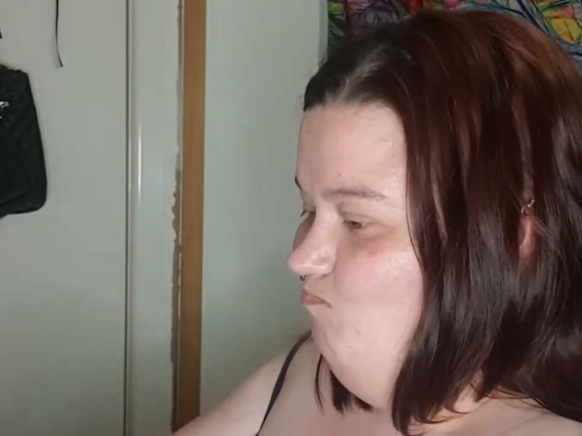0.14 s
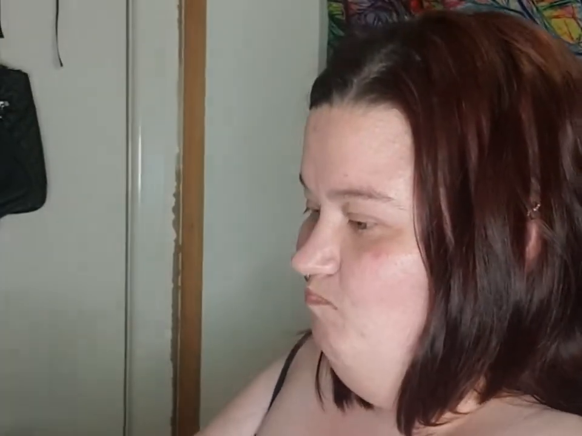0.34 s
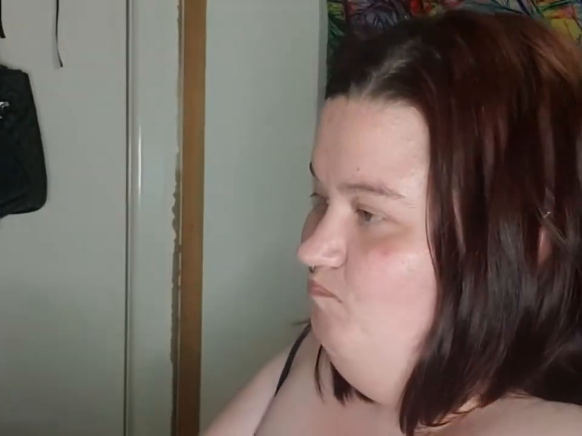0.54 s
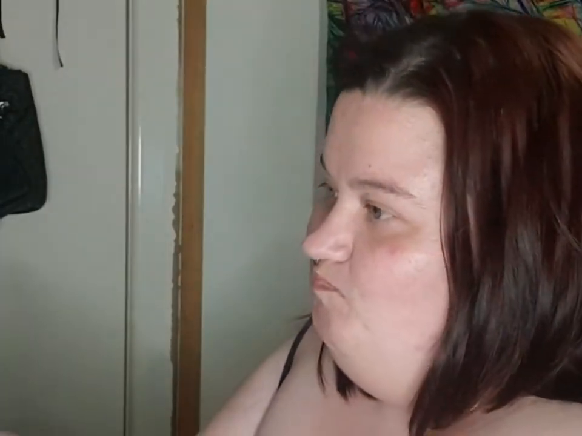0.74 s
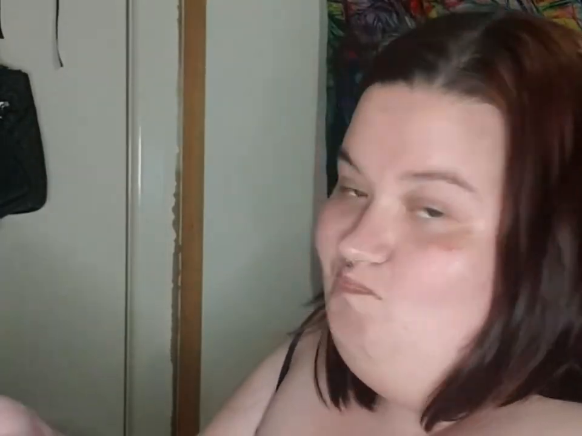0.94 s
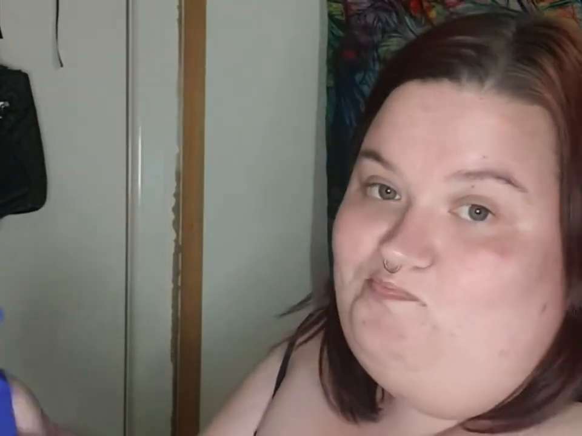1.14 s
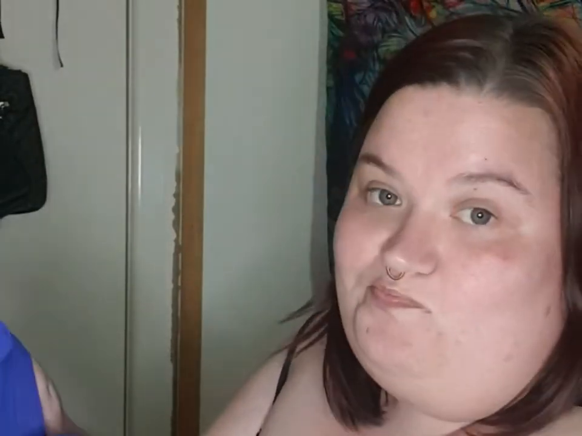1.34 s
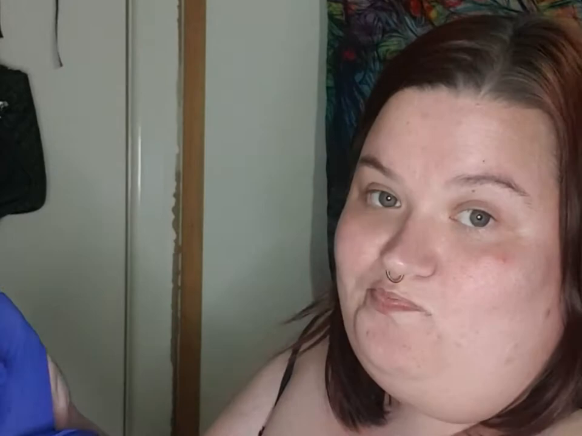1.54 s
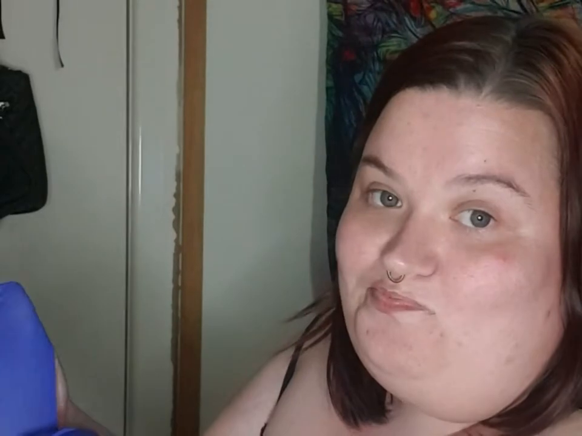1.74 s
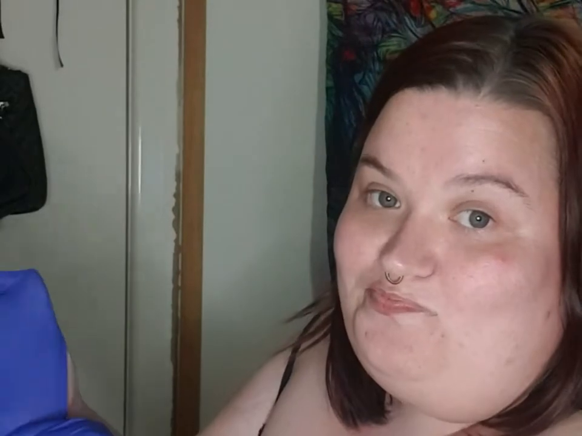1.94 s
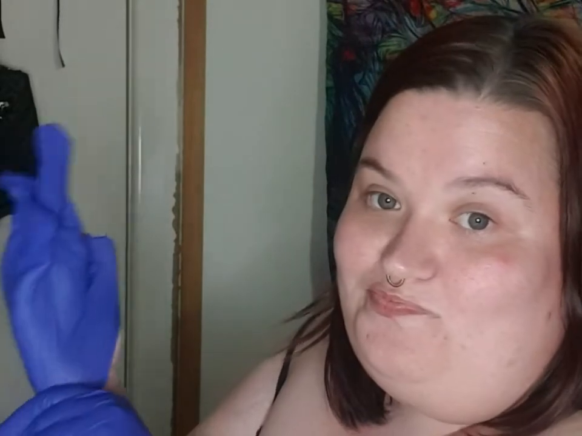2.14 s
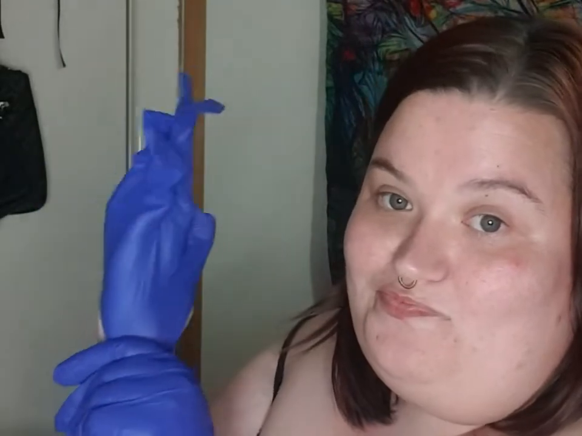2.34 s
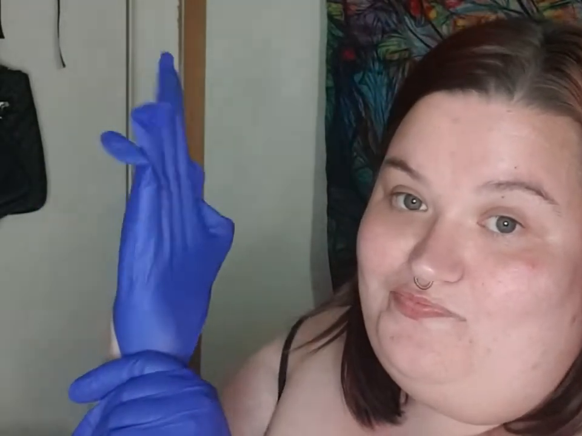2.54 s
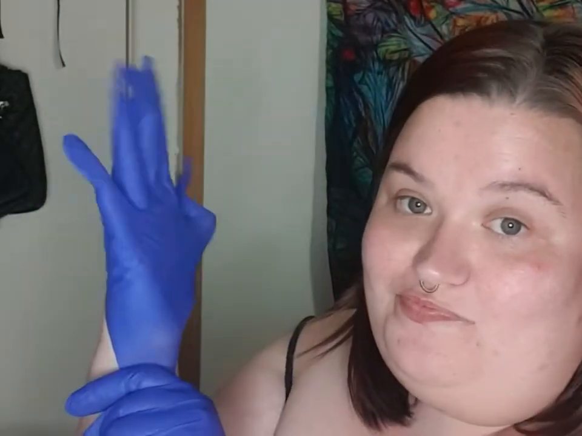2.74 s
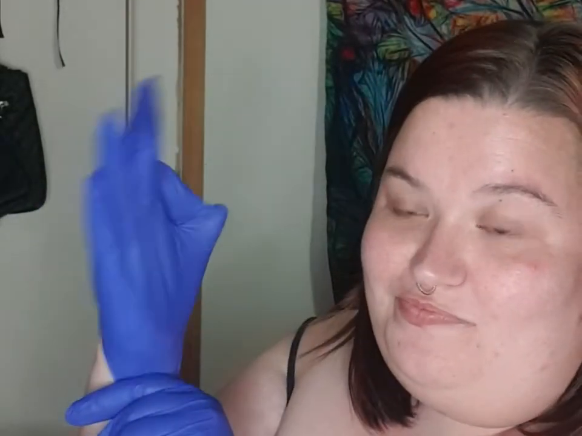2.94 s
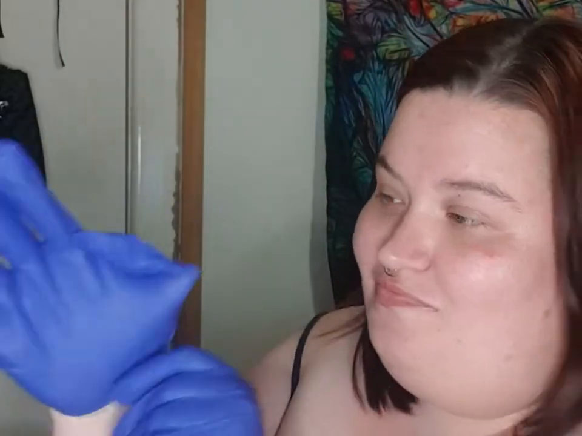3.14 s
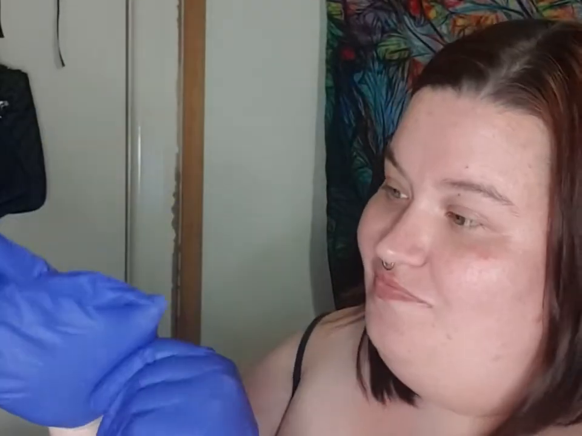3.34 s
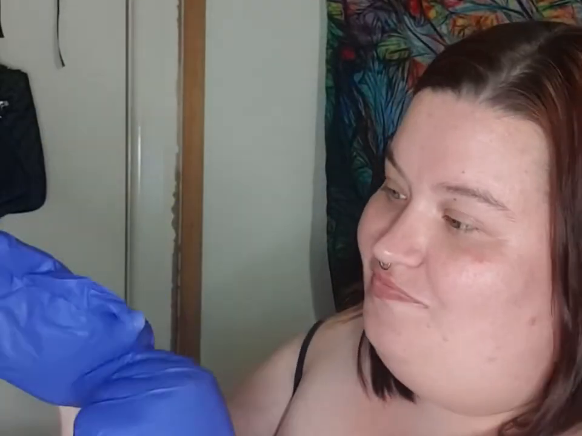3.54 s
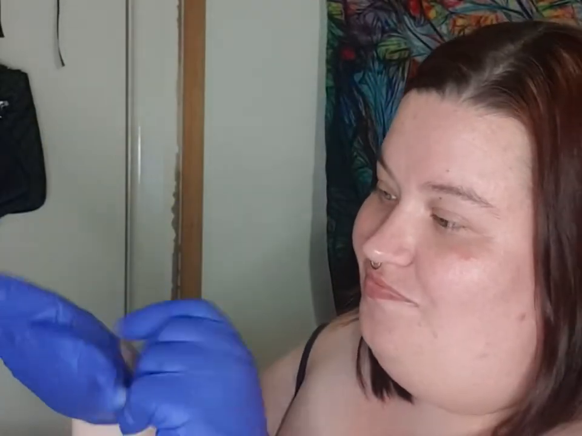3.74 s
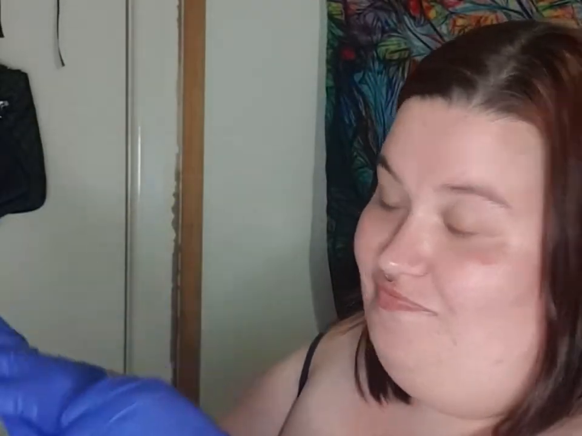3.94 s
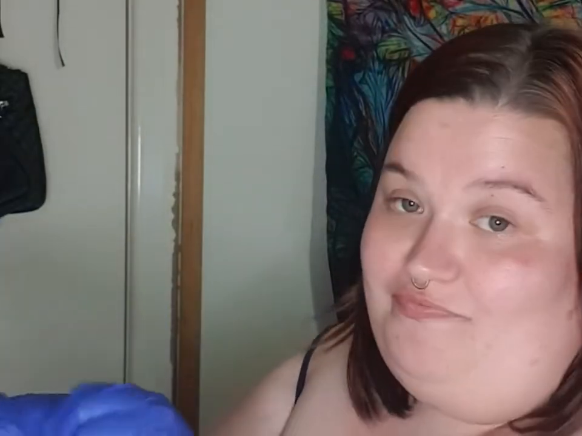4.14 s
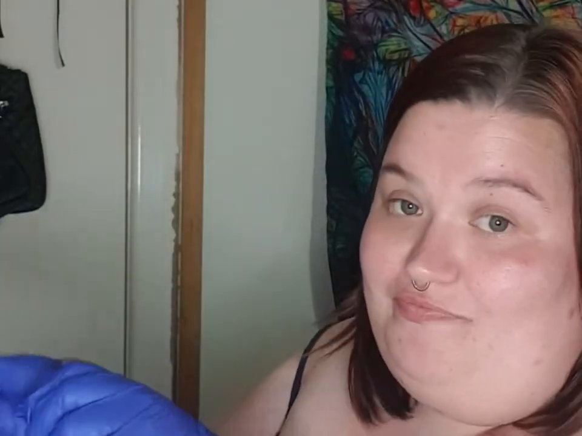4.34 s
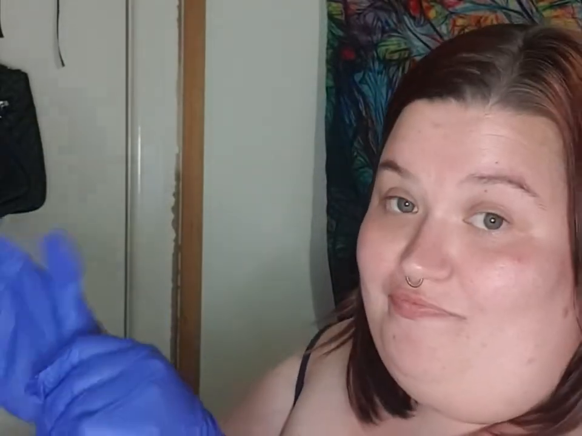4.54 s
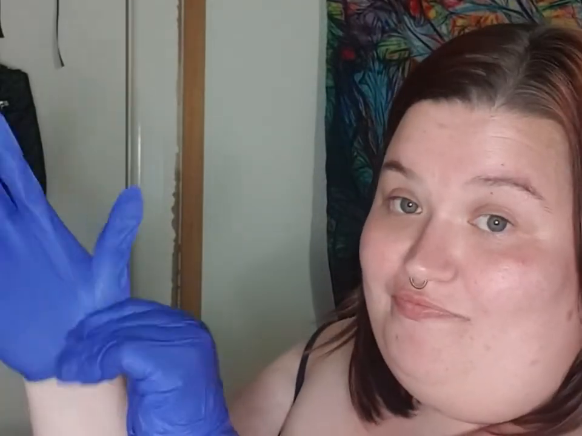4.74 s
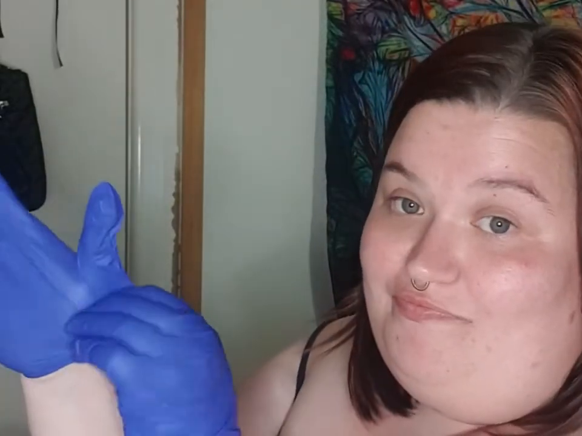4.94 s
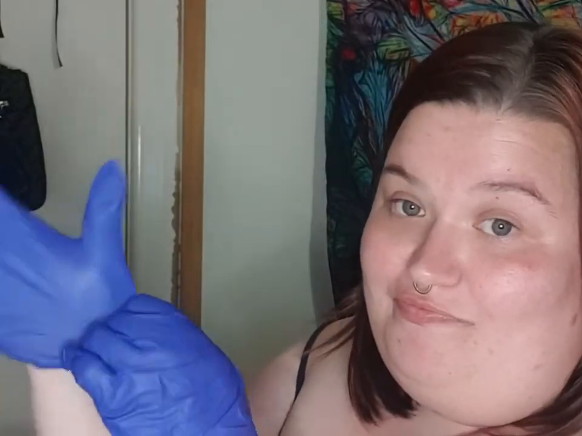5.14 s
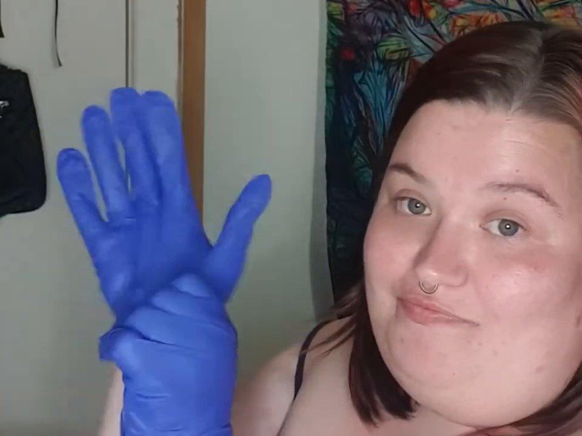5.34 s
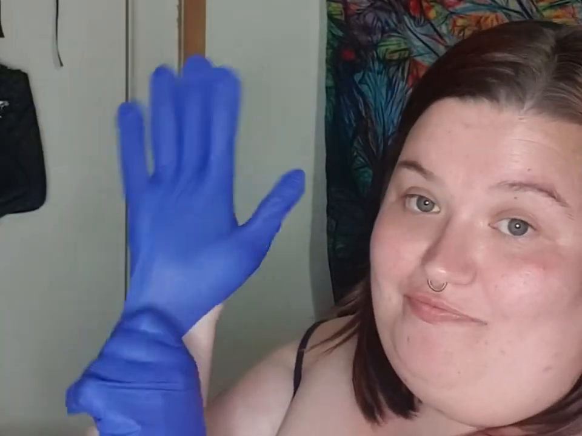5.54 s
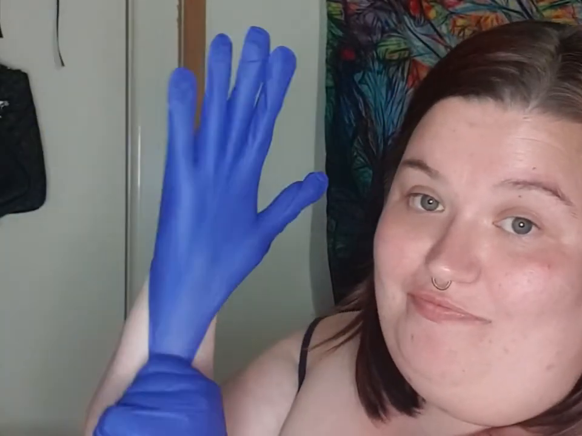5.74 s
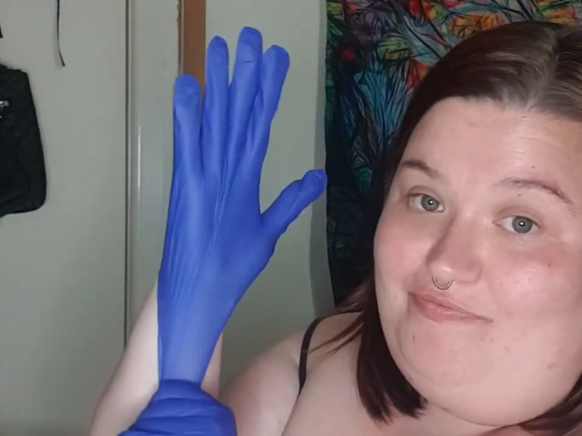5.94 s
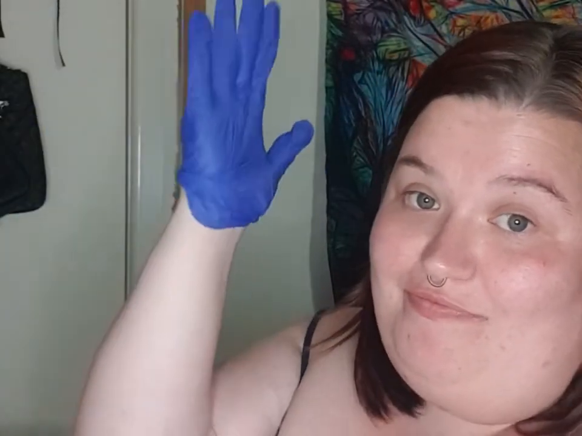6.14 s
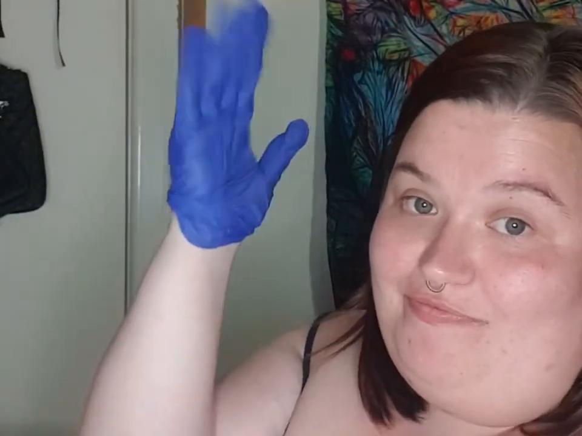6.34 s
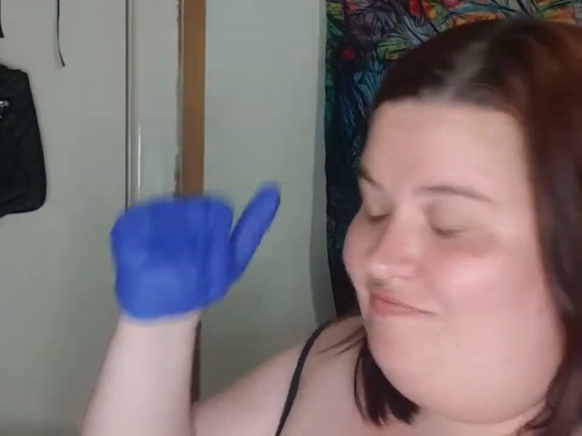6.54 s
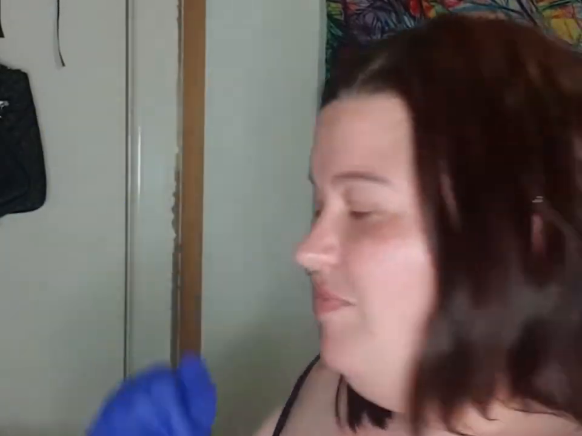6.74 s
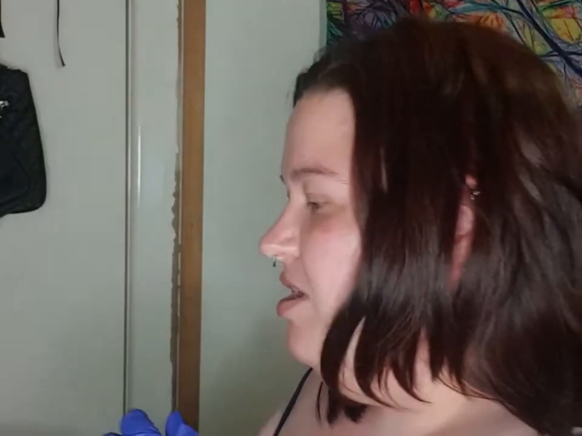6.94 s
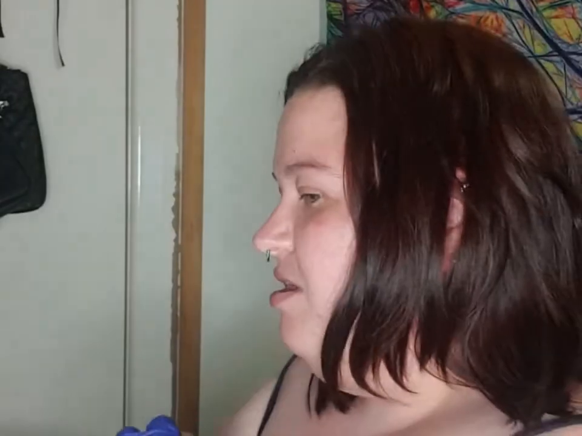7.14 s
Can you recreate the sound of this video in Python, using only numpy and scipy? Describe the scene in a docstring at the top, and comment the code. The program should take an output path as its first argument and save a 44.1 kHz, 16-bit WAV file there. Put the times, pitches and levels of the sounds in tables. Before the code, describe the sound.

A steady low hum and soft rush of air fill a small, dry room. During the first second a chair creaks faintly while thin rubber gloves begin to rustle against skin, close to the microphone. From about 1.2 to 3.2 seconds the rubber is tugged over the hands, crinkling and snapping in irregular clusters, with dull little thumps and puffs of trapped air. Softer rubbing follows until about 4.2 seconds, when a quick run of crackles and a short squeak come from the taut rubber. More stretching leads to a sharp snap at 5.4 seconds, with another squeak and several smaller snaps. The loudest snap cracks just after 6 seconds. Only a faint rustle follows, then one last bright, lighter snap at about 7 seconds over the hum.

```python
"""A small, dry room with mains hum, where thin rubber gloves are pulled on close to a two-port microphone.
Stick-slip friction on skin makes the rubber rustle, crinkle and, where taut, squeak. Folds let go with
a snap and thump the hand beneath; puffs of trapped air burble in a resonant pocket at the palm.
During the first second a chair creaks as a slipping joint rings and knocks the frame."""
import sys
import numpy as np
from scipy import signal
from scipy.fft import rfft, irfft, next_fast_len
from scipy.io import wavfile

SR = 44100
rng = np.random.default_rng(int(sys.argv[2]) if len(sys.argv) > 2 else 0)


def pcm_store(signal):
    """Save signal as 16-bit PCM."""
    levels = np.round(np.clip(np.atleast_2d(signal), -1, 1) * 32767)
    wavfile.write(sys.argv[1], SR, levels.astype(np.int16).T)


N = 321489

# likeness of the room's sound at the two ports: frequency_hz, correlation
PORT_COHERENCE = [(60, .94), (150, 0.81), (300, 1), (700, .4), (1500, 0.11), (4000, .1), (8000, .01)]


def rustle():
    """Sliding friction: dense slips drive the rubber; tension raises pitch and fizz and lessens flapping."""
    # strokes of rubber over skin: start_s, rise_s, hold_s, level_db, pitch_hz
    strokes = [(0.011, 0.029, 0.076, -57, 3900), (0.133, 0.04, 0.11, -57.5, 3870),
               (0.3, 0.068, 0.025, -55.5, 3400), (0.449, 0.069, 0.15, -54.5, 2660),
               (0.679, 0.046, 0.077, -49.5, 3460), (0.825, 0.039, 0.076, -49.5, 2430),
               (0.959, 0.059, .08, -50.5, 2570), (1.154, 0.036, 0.11, -44.5, 3600),
               (1.389, 0.026, .1, -49.5, 2400), (1.523, 0.019, 0.11, -57.5, 2780),
               (1.69, 0.0051, 0.011, -46, 2720), (1.733, 0.08, 0.12, -43, 2500),
               (1.976, 0.024, 0.053, -52.5, 3420), (2.038, 0.042, 0.13, -48, 2490),
               (2.313, .012, .01, -52, 3600), (2.429, 0.01, 0.047, -43.5, 3600),
               (2.526, 0.031, 0.027, -46, 3850), (2.62, 0.0098, 0.076, -46.5, 2660),
               (2.784, 0.02, 0.13, -52, 2900), (2.994, 0.016, 0.018, -56, 4430),
               (3.042, 0.025, 0.11, -49, 4400), (3.295, 0.015, 0.01, -51.5, 4700),
               (3.376, 0.011, 0.0076, -62.5, 4500), (3.64, 0.073, .04, -50.5, 4960),
               (3.832, 0.026, .1, -56.5, 3900), (4.014, 0.029, 0.12, -61, 4300),
               (4.166, 0.031, 0.036, -45, 3180), (4.271, 0.027, 0.045, -40.5, 3070),
               (4.321, .02, 0.095, -44.5, 3240), (4.496, 0.045, 0.081, -47, 2780),
               (4.698, 0.14, 0.052, -47.5, 4400), (4.949, 0.15, 0.1, -48, 4450),
               (5.212, 0.01, 0.14, -47, 3900), (5.416, 0.023, 0.12, -37.5, 2780),
               (5.608, 0.01, 0.0082, -40.5, 2860), (5.626, 0.0052, 0.0049, -35, 2870),
               (5.767, 0.035, 0.022, -68, 4800), (6.325, .02, 0.021, -78.5, 2200),
               (6.405, 0.076, 0.0067, -54, 4500), (7.008, .006, 0.0052, -50, 3300)]
    slack_pitch_hz = 2555
    out, slips = np.zeros(N), crinkle(per_s=240, spread_db=2.5, t60=0.032, steady=0.95)
    for start, rise, hold, level_db, hz in strokes:
        drive, envelope = gesture(slips, start, rise, hold, level_db, fall_db_per_s=325)
        octaves_up = np.log2(hz / slack_pitch_hz)
        fizz_db, slack_db = -8.5 + 4.5 * octaves_up, -8 - 11 * octaves_up
        add(out, start, envelope * rubber(drive, hz, fizz_db, slack_db, width_hz=3200, ring_db=20))
    return out


def rubber(drive, hz, fizz_db, slack_db, width_hz, ring_db):
    """Membrane radiation: a broad body with a resonance at hz, fizz above it and slack flapping below."""
    # broad spectrum of the sheet: frequency_hz, gain_db
    spectrum = [(450, -17), (800, -15), (1300, -10), (2000, -4), (3600, -5.5), (5800, -2), (7000, -10.5),
                (10000, -14), (14600, -16), (16000, -26.5)]
    fizz_hz, slack_hz = 7600, 1850
    whole = colour(drive, lambda f: gain_of(read(spectrum, f)))
    fizz = colour(whole, lambda f: 1 / (1 + (fizz_hz / (f + 1)) ** 12))
    slack = colour(whole, lambda f: 1 / (1 + (f / slack_hz) ** 12))
    body = whole - fizz - slack
    ring = gain_of(ring_db) * unit_rms(resonate(body, hz, width_hz))
    hump = unit_rms(unit_rms(body) + ring)
    return hump + gain_of(fizz_db) * unit_rms(fizz) + gain_of(slack_db) * unit_rms(slack)


def snap(peak_db, hz, thump_db, fizz_db, noise):
    """Impulse excitation: a released fold flutters briefly and rings the damped modes of the hand."""
    # modes of the gloved hand: frequency_hz, gain_db, t60_s
    hand_modes = [(162, -8, 0.11), (242.6, -2.5, 0.067), (505, 7, 0.0067), (830, 1.5, 0.023)]
    t = np.arange(len(noise)) / SR
    flutter_t60 = 0.038 * gain_of(0.4 * peak_db)  # weaker folds settle sooner
    drive = noise * np.minimum(t / 0.00013, 1) * gain_of(-60 * (t / flutter_t60) ** 1.77)
    crack = rubber(drive, hz, fizz_db, slack_db=thump_db / 2 - 3.5, width_hz=hz / 4.5, ring_db=5.0)
    thump = unit_rms(damped_modes(hand_modes, t, detunes=0.051 * noise[::-1]))
    return gain_of(peak_db) * (crack + gain_of(thump_db) * thump) / abs(crack).max()


def snaps():
    """Release of elastic energy: folds let go one by one; near 4.2 s stick-slip ticks quicken until a fast run
    of even slips chatters."""
    # folds letting go, and around 4.2-4.3 s short stick-slip ticks of rubber on skin: start_s, crack_peak_db,
    # pitch_hz, relative_thump_db, relative_fizz_db
    folds = [(1.214, -24.5, 5100, -7, 4), (1.2685, -25.5, 3100, -5.5, -27), (1.404, -33.5, 3500, -13, -31),
             (1.4385, -34, 2680, -9, -29), (1.6955, -23, 2900, -5.5, -12), (1.744, -28.5, 2160, 5, -28),
             (1.7637, -29, 2010, -1, -19), (1.7804, -25, 1570, -2, -32), (1.8088, -20.5, 2960, -4, -35),
             (1.9092, -16.5, 1430, -3.5, -8.5), (2.1735, -23.5, 1810, -4, -12),
             (2.1934, -27.5, 1870, 1, -11), (2.2204, -23, 2100, -7, -14.5), (2.3304, -35, 3900, -18, -10),
             (2.4334, -26, 5560, -25, -19), (2.4414, -19, 3130, -8, -9.5), (2.5501, -24, 4340, -33, -8),
             (2.5704, -27, 4090, -32, -4), (2.6261, -17.5, 2740, -11, -16), (2.6495, -25, 2900, -20, -14),
             (2.655, -15.5, 2820, -7.5, -9.5), (2.672, -21.5, 2950, -29, -28),
             (2.6935, -20.5, 2920, -7, -23), (2.798, -28, 5400, -13, -12), (2.824, -25, 2780, 1, -16),
             (2.8614, -29.5, 1500, -4, -25), (2.8905, -12, 2700, -2.5, -9),
             (3.1605, -15.5, 5200, -20.5, 1.5), (4.2263, -21.5, 3000, -31, -31),
             (4.244, -19.5, 3060, -40, -30), (4.26, -21, 1980, -27, -17), (4.2895, -26, 3230, -45, -26),
             (4.3162, -13, 3400, -40, -15.5), (4.3235, -19, 3700, -17, -25), (4.527, -27, 5100, -23, -12),
             (4.544, -27.5, 4500, -19, -20), (5.1632, -35.5, 2560, 5, -20), (5.234, -23, 4830, -10, -11),
             (5.4354, -9, 1910, -19, -9.5), (5.5335, -18.5, 3540, -15, -7), (5.6156, -18.5, 3370, -15, -34),
             (5.635, -15, 2700, -25, -16.5), (5.6443, -14.5, 2770, -25, -20.5),
             (5.652, -18, 2400, -27, -12), (5.7114, -27, 4630, -39, -29), (6.056, -11, 4400, -42, -10.5),
             (6.0642, 1, 3520, -17, -5.5), (6.959, -10, 5600, -41, 2.5), (7.0117, -26, 3900, -9, -23.5)]
    chatter_start_s, gap_s = 4.2957, 0.0023
    chatter = [(chatter_start_s + k * gap_s, -21, 3300, -52, -19) for k in range(7)]  # columns as in folds
    out = np.zeros(N)
    for start, *fold in folds + chatter:
        add(out, start, snap(*fold, noise=rng.standard_normal(2600)))
    return out


def burbles():
    """Cavity resonance: uneven puffs ring the air pocket trapped in the palm."""
    # burbles of the pocket: start_s, rise_s, hold_s, level_db, pitch_hz
    puffs = [(.48, 0.082, 0.21, -63, 270), (.85, 0.013, 0.12, -55.5, 310), (.98, 0.01, 0.058, -47, 440),
             (1.17, 0.039, 0.12, -51, 414), (1.4, .03, .18, -55.5, 397), (1.693, 0.0042, 0.011, -36, 450),
             (1.742, 0.0026, 0.0055, -39, 370), (1.759, 0.0054, 0.013, -32, 310),
             (1.778, 0.0053, .014, -37, 330), (1.8, 0.0034, 0.01, -44, 340),
             (1.82, 0.043, 0.021, -31.5, 270), (1.893, 0.0064, 0.016, -34, 280),
             (2.07, 0.038, 0.084, -46, 490), (2.55, 0.0067, 0.017, -45.5, 255),
             (2.624, 0.0019, 0.008, -32.5, 620), (2.652, 0.0065, 0.0083, -33.5, 800),
             (2.691, 0.0015, 0.004, -34.5, 720), (2.63, 0.042, 0.035, -42.5, 473),
             (2.81, 0.011, 0.025, -60, 402), (2.885, 0.0045, 0.0076, -38.5, 606),
             (4.3, 0.054, 0.064, -41, 520), (4.382, 0.019, 0.011, -41.5, 490),
             (4.422, 0.0056, 0.0079, -54, 465), (4.515, 0.019, 0.089, -46, 497),
             (5.161, .003, .02, -42, 640), (5.21, 0.018, 0.075, -47, 590),
             (5.428, 0.0033, 0.0078, -41, 360), (5.525, 0.0047, 0.037, -44, 585),
             (5.595, 0.0049, 0.0585, -44.5, 400), (5.68, 0.0058, 0.0072, -51, 456)]
    return resonant_bursts(puffs, fall_db_per_s=603.5, q=1.4)


def squeaks():
    """Stick-slip friction: taut rubber catching on skin rings a narrow resonance."""
    # rubs of taut rubber: start_s, rise_s, hold_s, level_db, pitch_hz
    rubs = [(.86, 0.018, 0.068, -57, 2100), (.95, 0.011, 0.054, -50.5, 1650),
            (4.185, .01, 0.025, -43.5, 2110), (4.29, .01, 0.06, -35.5, 3400),
            (5.455, 0.0087, 0.1, -37.5, 3570)]
    return resonant_bursts(rubs, fall_db_per_s=400, q=5)


def chair():
    """Modal ringing: every slip of a chair joint rings the joint and knocks the frame."""
    # slips of the joint: start_s, level_db
    creaks = [(0.0044, -43), (0.0438, -39.5), (0.0952, -39), (0.1853, -44), (0.2202, -39.5), (0.29, -44.5),
              (0.3102, -39), (0.3984, -43.5), (0.4655, -41), (0.4944, -40.5), (0.5258, -38.5), (0.55, -36),
              (0.5796, -38), (0.607, -36), (0.6694, -39), (0.7462, -40), (0.792, -40.5), (0.8796, -36)]
    # modes of the joint: frequency_hz, gain_db, t60_s
    joint_modes = [(2530, 7.5, 0.018), (1000, -12, 0.049), (713, 4, 0.016), (495, 6, 0.017)]
    knock_hz, knock_db, knock_t60 = 176, 6, 0.038
    out, t = np.zeros(N), np.arange(3000) / SR
    attack = np.minimum(t / 0.0028, 1)
    for start, level_db in creaks:
        wobble = rng.uniform(-1.14, 1, 5)
        joint = damped_modes(joint_modes, t, detunes=0.022 * wobble[:4])
        knock = damped_modes([(knock_hz, knock_db, knock_t60)], t, detunes=0.055 * wobble[4:])
        add(out, start, gain_of(level_db) * (joint + knock) * attack)
    return out


def reverberation(x):
    """Diffuse reflection: sparse echoes of random sign, each band dying away at its own rate."""
    # reverberation time of the room: frequency_hz, t60_s
    decay_times = [(200, 0.14), (1000, 0.23), (3000, 0.14), (12000, 0.18)]
    echoes = np.zeros((2, 16000))
    arrivals = np.arange(120, 15960, 20) + rng.integers(0, 20, (2, 792))
    np.put_along_axis(echoes, arrivals, rng.choice([-1., 1.], arrivals.shape), 1)
    hz, t, (left, independent) = signal.stft(echoes, SR, nperseg=256)
    alike = read(PORT_COHERENCE, hz)[:, None]  # long waves reach both ports alike
    right = alike * left + np.sqrt(1 - alike ** 2) * independent
    decay = gain_of(-60 * t / read(decay_times, hz)[:, None])
    tail = signal.istft(np.array([left, right]) * decay, SR, nperseg=256)[1]
    return signal.fftconvolve(x[None], tail / np.linalg.norm(tail[0]), axes=1)[:, :N]


def room_air():
    """Ambient noise: a low rush whose coherence between the ports falls toward the treble."""
    # spectrum of the room's air: frequency_hz, relative_density_db
    spectrum = [(15, -32), (25, -9), (53, -10), (70, -17), (102, -13.5), (127, -15.5), (206, -24),
                (277, -33), (427, -41), (1100, -46), (2600, -50), (5730, -46), (8590, -63), (14800, -49),
                (16000, -57.5)]
    left, independent = colour(rng.standard_normal((2, N)), lambda f: gain_of(read(spectrum, f)))
    right = colour(left, lambda f: read(PORT_COHERENCE, f))
    right += colour(independent, lambda f: np.sqrt(1 - read(PORT_COHERENCE, f) ** 2))
    return gain_of(-51.5) * unit_rms(np.array([left, right]))


def mains_hum():
    """Amplitude modulation: over the hum's steady lowest partial, two higher ones waver in level."""
    # partials of the hum: frequency_hz, level_db, waver_rms_db
    partials = [(51.8, -61.5, 0), (98.4, -51.5, 2.5), (211.6, -68.5, 1.5)]
    hum, t = np.zeros(N), np.arange(N) / SR
    waver_rates_hz = np.geomspace(.5, 9, num=16)
    for hz, db, waver_db in partials:
        waver = unit_rms(sum(np.sin(2 * np.pi * (f * t + rng.random())) for f in waver_rates_hz))
        hum += gain_of(db + waver_db * waver) * np.sqrt(2) * np.sin(2 * np.pi * (hz * t + rng.random()))
    return hum


def ports(x):
    """Diffraction: the path round the microphone's body turns the treble's phase, the bass hardly at all."""
    # phase of the right port against the left: frequency_hz, lead_rad
    phase_lead = [(100, .05), (500, 0.9), (1460, 1.6), (3530, 1.4), (8440, 1.69), (15000, 1.2)]
    return np.array([x, colour(x, lambda f: np.exp(1j * read(phase_lead, f)))])


def resonant_bursts(bursts, fall_db_per_s, q):
    """Forced resonance: uneven noise passes twice through a resonator of quality factor q."""
    out, stream = np.zeros(N), crinkle(per_s=260, spread_db=1.5, t60=0.022, steady=0.7)
    for start, rise, hold, level_db, hz in bursts:
        drive, envelope = gesture(stream, start, rise, hold, level_db, fall_db_per_s)
        ring = resonate(resonate(drive, hz, hz / q), hz, hz / q)
        add(out, start, envelope * unit_rms(ring))
    return out


def crinkle(per_s, spread_db, t60, steady):
    """Poisson process: noise jumps in strength at random slips and decays back to a steady share."""
    strengths = gain_of(spread_db * np.minimum(rng.exponential(1, N), 4))
    slips = strengths * (rng.random(N) < per_s / SR)
    jumps = unit_rms(signal.lfilter([1], [1, -gain_of(-60 / t60 / SR)], slips))
    return unit_rms((steady + jumps) * rng.standard_normal(N))


def gesture(source, start, rise, hold, level_db, fall_db_per_s):
    """One movement's stretch of a source, and its envelope: exponential rise, hold, exponential decay."""
    rise, rise_db, fall_db = max(rise, .002), 18, 45
    part = source[round(start * SR):][:round((rise + hold + fall_db / fall_db_per_s) * SR)]
    t = np.arange(len(part)) / SR
    attack_db = rise_db * np.minimum(t / rise - 1, 0)
    release_db = -fall_db_per_s * np.maximum(t - rise - hold, 0)
    return part, gain_of(level_db + attack_db + release_db)


def damped_modes(modes, t, detunes):
    """Free vibration: a sum of decaying sines, each detuned by a fraction of its frequency."""
    return sum(gain_of(db - 60 * t / t60) * np.sin(2 * np.pi * hz * (1 + detune) * t)
               for (hz, db, t60), detune in zip(modes, detunes))


def resonate(x, hz, width_hz):
    """Heterodyning: shifting hz down to zero, smoothing and shifting back gives a resonance of gain 1."""
    carrier = np.exp(2j * np.pi * np.cumsum(hz * np.ones(len(x))) / SR)
    pole = np.exp(-np.pi * width_hz / SR)
    return 2 * (carrier * signal.lfilter([1 - pole], [1, -pole], x / carrier)).real


def colour(x, gain):
    """Linear filtering by a gain given as a function of frequency."""
    size = next_fast_len(x.shape[-1] + 2048)
    return irfft(rfft(x, size) * gain(np.fft.rfftfreq(size, 1 / SR)), size)[..., :x.shape[-1]]


def read(points, hz):
    """Interpolation of a curve along log frequency."""
    f, value = np.transpose(points)
    return np.interp(np.log(hz + 1), np.log(f + 1), value)


def add(mix, start_s, sound):
    """Superposition of a sound on the mix from start_s on."""
    part = mix[round(start_s * SR):][:len(sound)]
    part += sound[:len(part)]


def gain_of(db):
    """Decibels as an amplitude ratio."""
    return 10 ** (np.asarray(db) / 20)


def unit_rms(x):
    """Normalisation to a mean power of 1."""
    return x / np.sqrt(np.mean(x ** 2) + 1e-20)


def scene():
    """Superposition of direct sound, reverberation and steady background at the two ports."""
    near = chair() + rustle() + burbles() + squeaks() + snaps()
    return ports(near) + gain_of(-6) * reverberation(near) + room_air() + mains_hum()


def record(dry):
    """Transducer response: a more sensitive left port, a treble notch, bass cut, clipping, band limit."""
    # loss of sensitivity at the right port: frequency_hz, loss_db
    right_loss = [(60, 7), (180, 7), (550, 5), (1200, 10), (2500, 6), (4970, 13), (8000, 4), (15000, 4.5)]
    notch_hz, notch_width_hz, notch_db = 8220, 590, -6
    low_cut_hz, high_cut_hz = 38, 15700
    left = dry[0] * gain_of(3.0)
    right = colour(dry[1], lambda f: gain_of(2.5 - read(right_loss, f)))
    notch = lambda f: gain_of(notch_db * np.exp(-((f - notch_hz) / notch_width_hz) ** 2))
    stereo = colour(np.array([left, right]), lambda f: notch(f) / (1 + (low_cut_hz / (f + 1)) ** 14))
    band_limit = signal.firwin(511, high_cut_hz, window=("kaiser", 9), fs=SR)
    return signal.oaconvolve(np.clip(stereo, -1, 1), band_limit[None], "same")


dry = scene()
out = record(dry)
pcm_store(out)
```